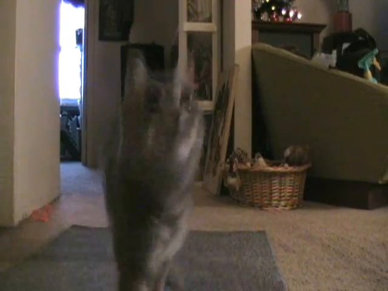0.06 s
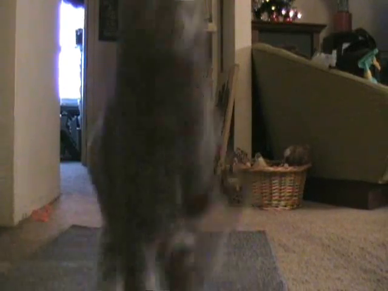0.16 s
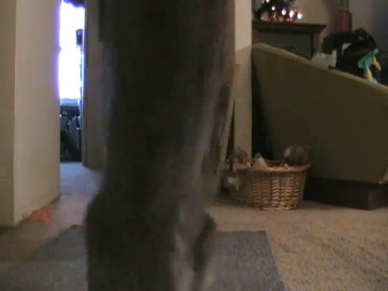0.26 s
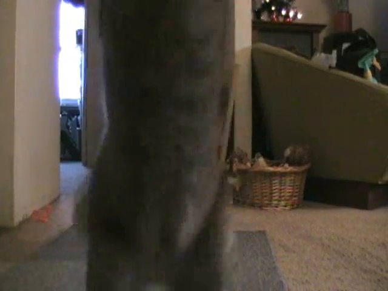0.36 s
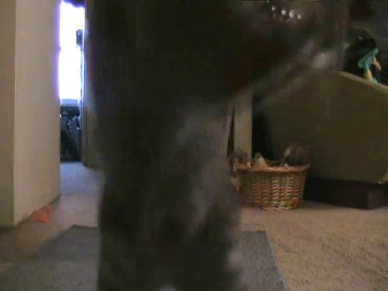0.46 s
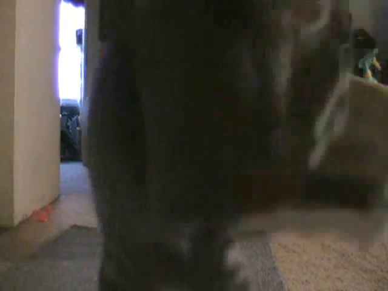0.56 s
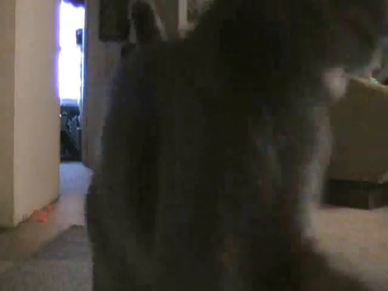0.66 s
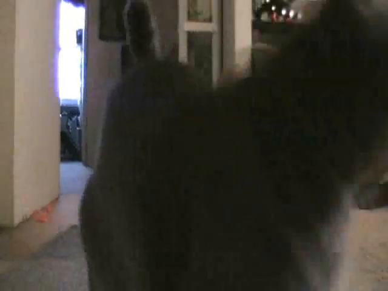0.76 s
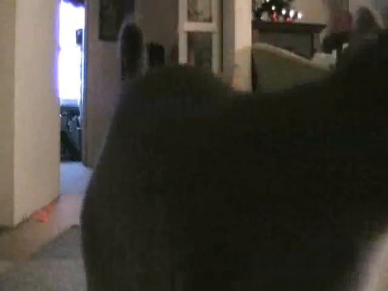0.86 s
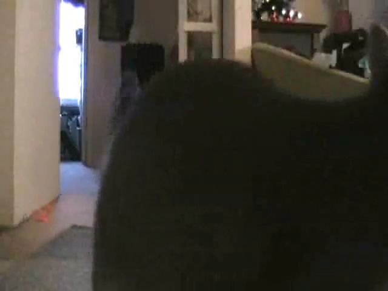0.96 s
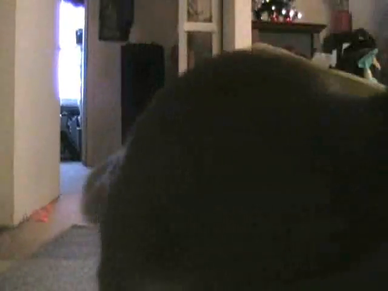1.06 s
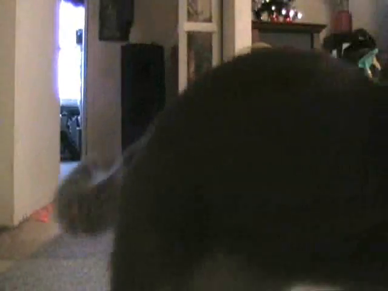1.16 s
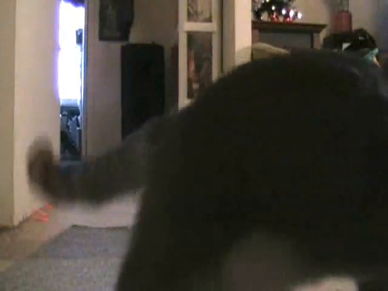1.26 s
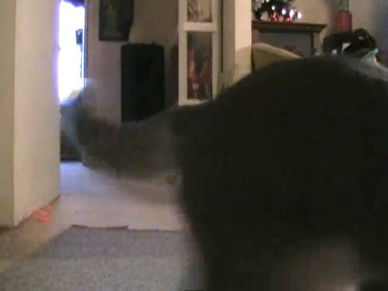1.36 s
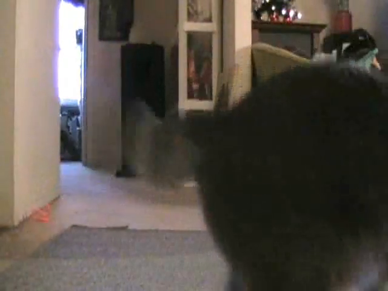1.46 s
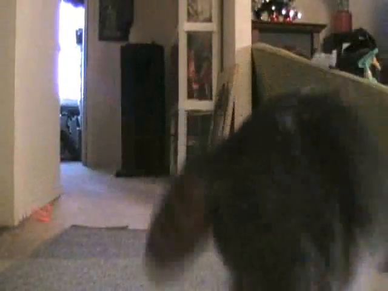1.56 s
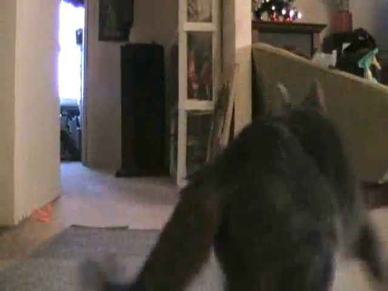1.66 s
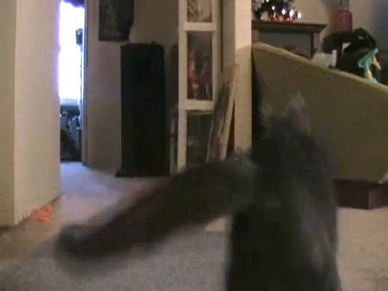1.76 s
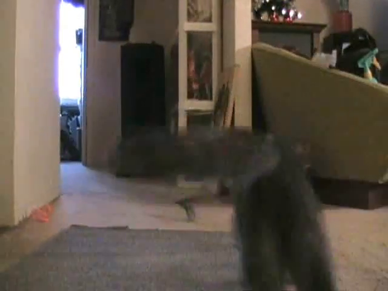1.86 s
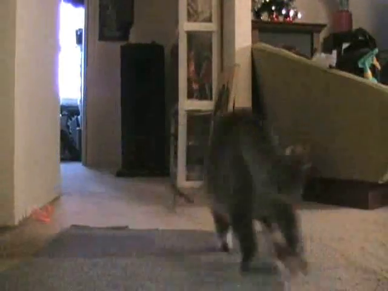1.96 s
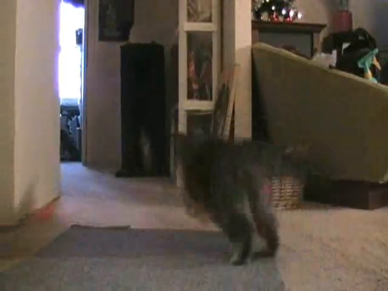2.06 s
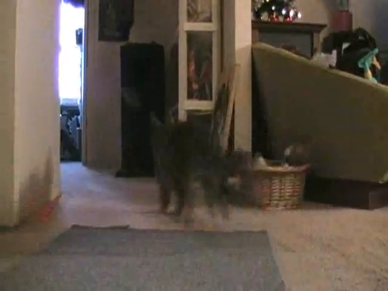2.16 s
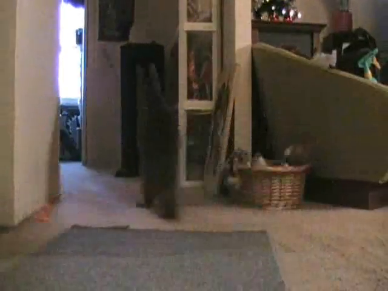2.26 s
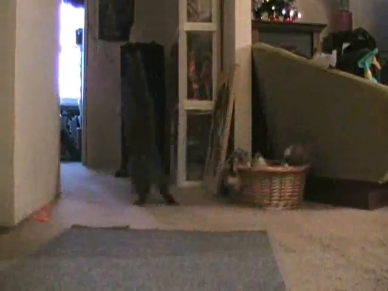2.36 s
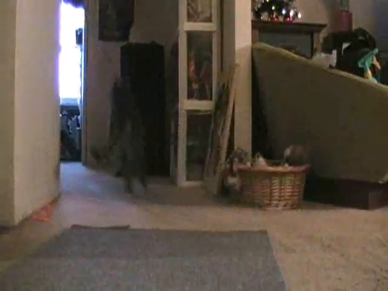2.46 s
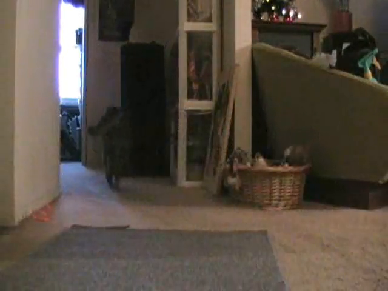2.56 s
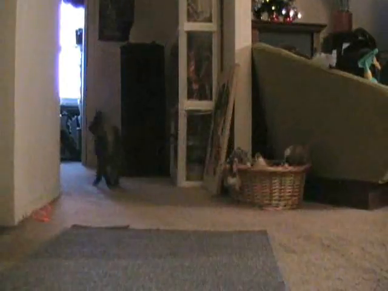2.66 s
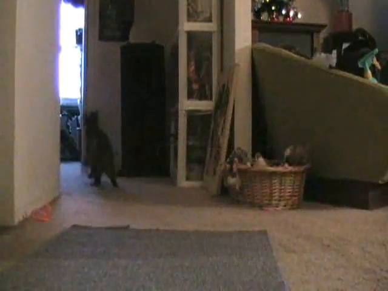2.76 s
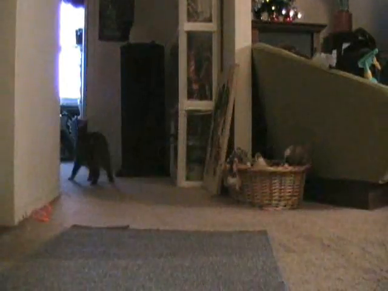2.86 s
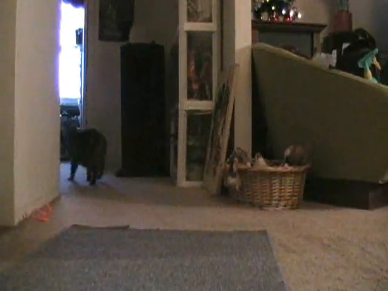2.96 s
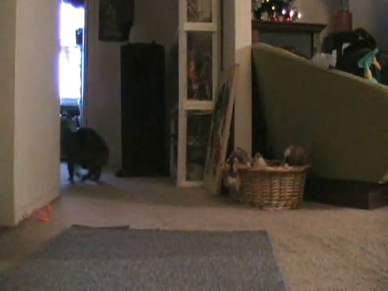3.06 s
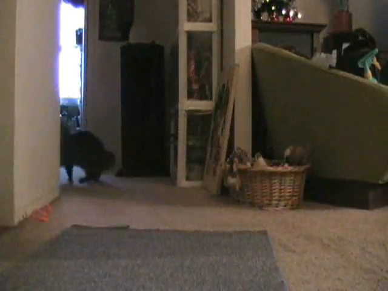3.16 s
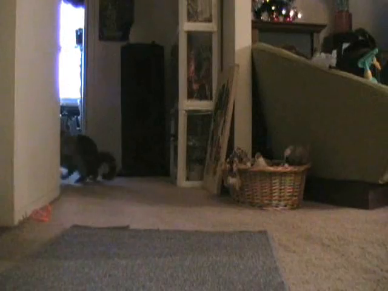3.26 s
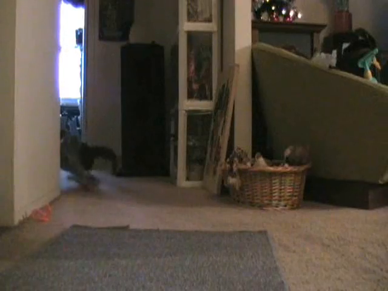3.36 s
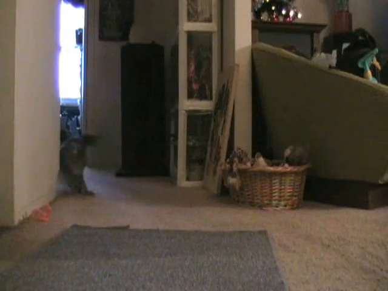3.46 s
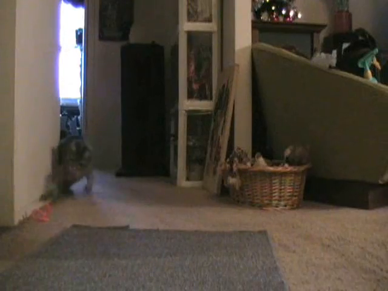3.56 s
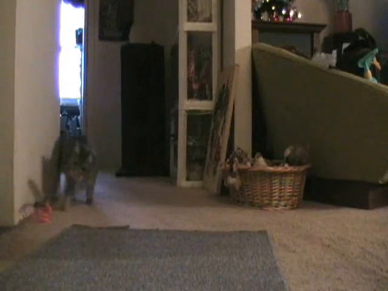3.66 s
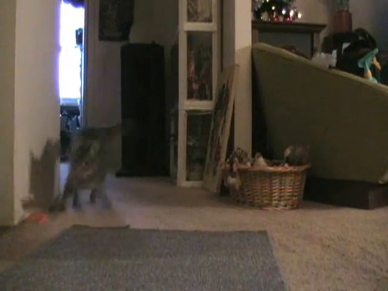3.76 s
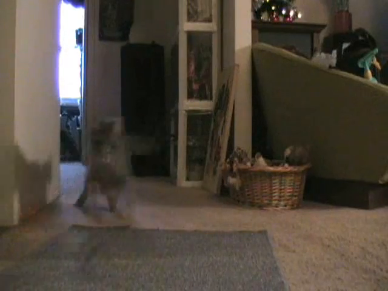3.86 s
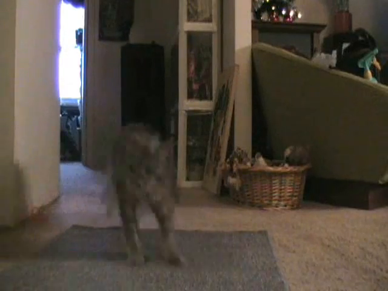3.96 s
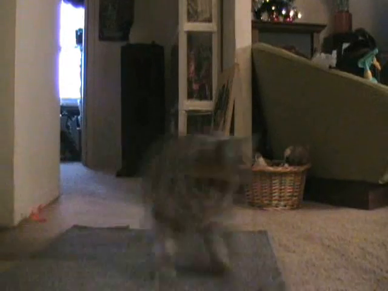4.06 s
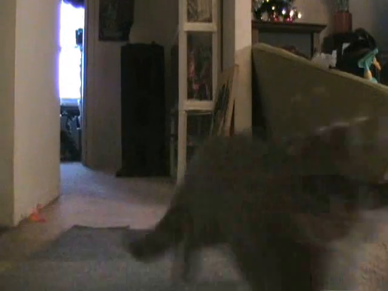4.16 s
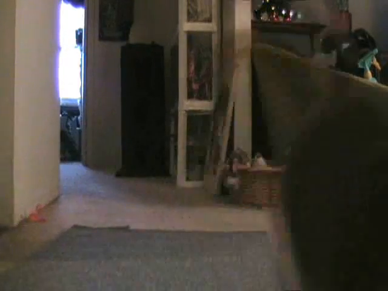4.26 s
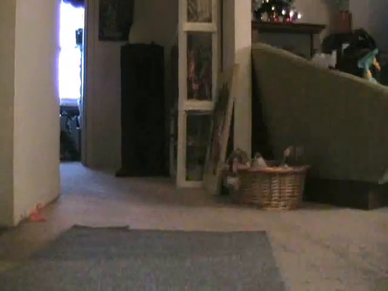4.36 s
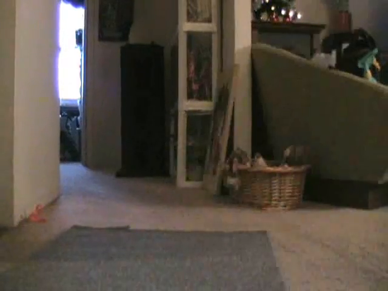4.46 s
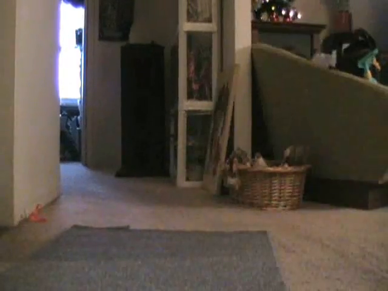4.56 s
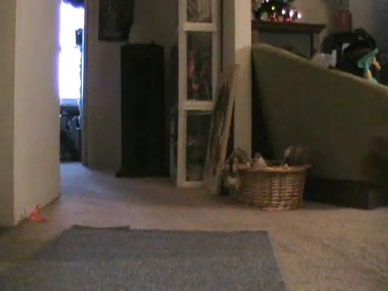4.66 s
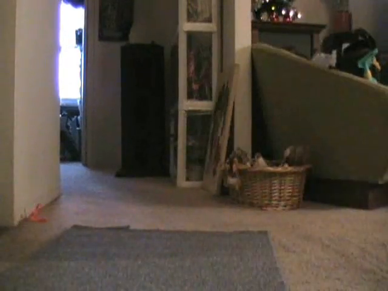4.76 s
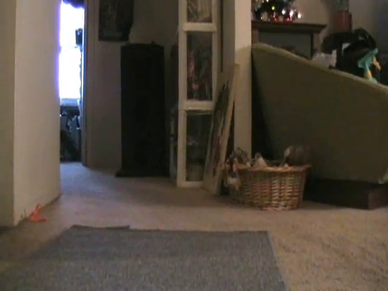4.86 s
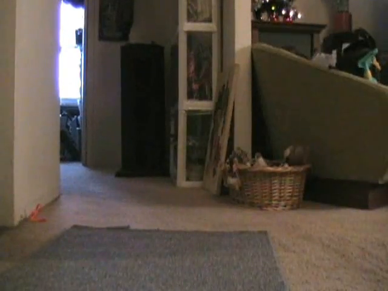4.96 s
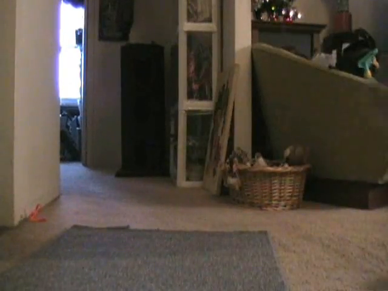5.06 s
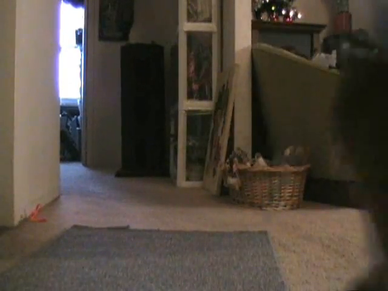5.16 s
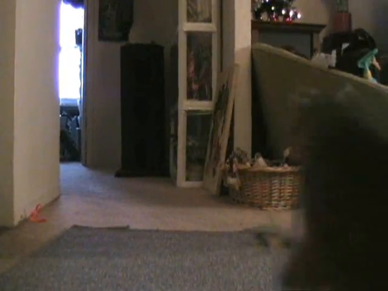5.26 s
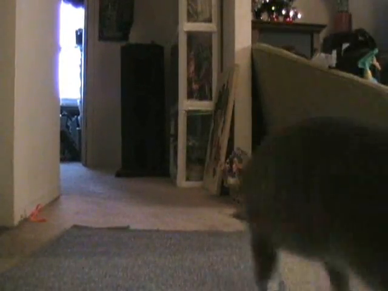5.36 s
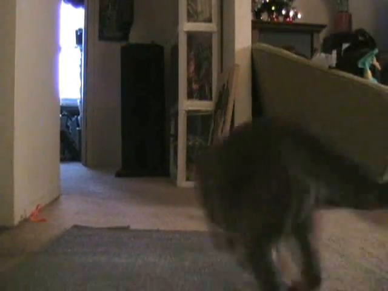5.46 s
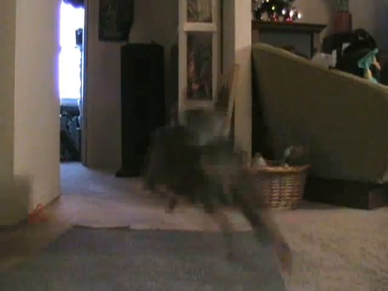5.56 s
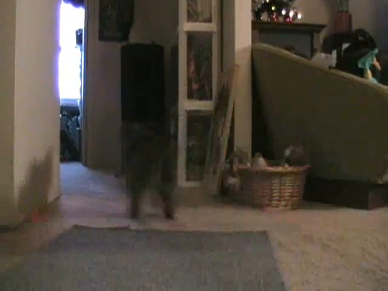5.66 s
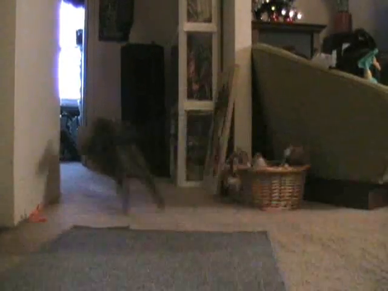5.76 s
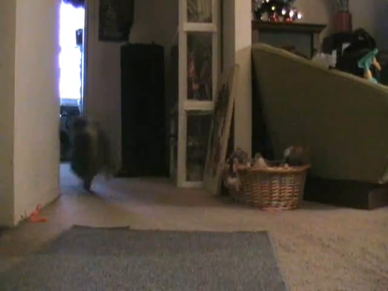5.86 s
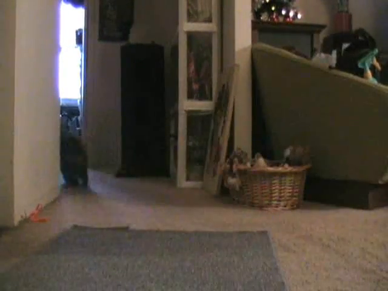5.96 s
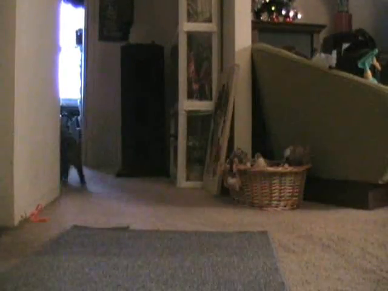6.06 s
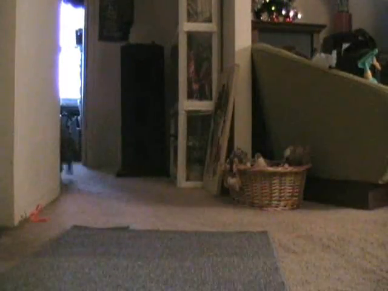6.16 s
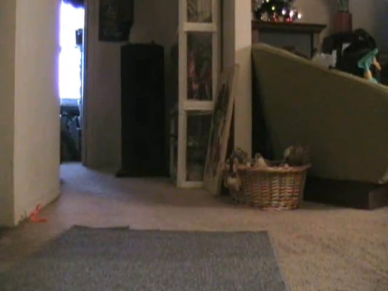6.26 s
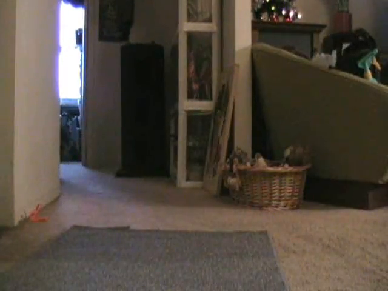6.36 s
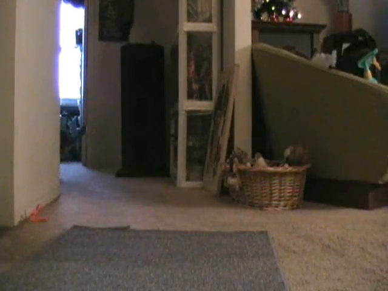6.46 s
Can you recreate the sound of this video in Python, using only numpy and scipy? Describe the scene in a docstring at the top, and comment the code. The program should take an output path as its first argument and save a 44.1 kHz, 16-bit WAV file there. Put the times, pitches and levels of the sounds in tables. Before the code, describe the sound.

A cat scrabbles and gallops over carpet close to a floor-level microphone, with sharp claw snaps, soft paw thumps, one hard bump, and steady hiss.

```python
"""Living room, carpet over a wooden floor: a cat pounces, skids and gallops close to a tape camcorder lying there.
Paws are sagging sine swings roughened with noise, heavy landings a slower sine of the joists.
Claws are filtered pulses with a spray of noise; pads and fur are coloured, swelling grains.
A jolt rings the camera body, with a far fainter knock behind it; sixteen feedback delays make the room.
Below lie microphone hiss, wavering hum and tones, and the whine of the tape drum's ticks."""
import sys
import numpy as np
from scipy import signal
from scipy.fft import rfft, irfft, next_fast_len
from scipy.io import wavfile

SR = 44100
rng = np.random.default_rng(int(sys.argv[2]) if len(sys.argv) > 2 else 0)


def natural_amplitude(level_db):
    """Convert a level in decibels to a linear amplitude factor, elementwise."""
    exponent = np.asarray(level_db, float) / 20
    return 10 ** exponent


def log_audio(samples):
    """Write samples as a 16-bit WAV file to the path given in sys.argv[1]."""
    # one column per channel
    frames = np.atleast_2d(samples).T
    # limit to full scale, then quantise
    limited = np.clip(frames, -1, 1)
    pcm = np.round(limited * 32767).astype(np.int16)
    wavfile.write(sys.argv[1], SR, pcm)


N = 287973   # samples, about 6.5 s

# Paw landings on the boards, close by; contact_s is how long the pad presses before the carpet damps:
# [start_s, level_db, pitch_hz, contact_s]
PAW_LANDINGS = [(.307, -31, 231, 0.0098), (0.322, -36.5, 127, 0.0079), (.381, -35.5, 526, 0.0034),
                (.408, -26, 510, 0.0048), (0.523, -27, 138, 0.016), (.617, -29.5, 320, 0.01),
                (0.633, -18.5, 530, 0.0022), (0.644, -33.5, 247, 0.011), (0.658, -24, 136, 0.0045),
                (0.818, -21.5, 252, 0.0089), (1.652, -31.5, 180, 0.0064), (1.839, -30, 197, 0.0094),
                (1.9, -29.5, 223, 0.0066), (1.976, -29, 167, 0.013), (2.112, -30, 296, 0.0032),
                (2.249, -31, 133, 0.051), (2.289, -30.5, 288, 0.02), (2.29, -36, 750, 0.027),
                (2.3708, -15, 248, 0.0045), (2.381, -28.5, 610, 0.0054), (2.383, -26, 220, 0.0092),
                (2.394, -26, 240, 0.014), (2.413, -18.5, 263, 0.0038), (2.43, -29, 194, 0.013),
                (2.655, -32.5, 196, 0.035), (3.409, -31.5, 240, 0.019), (3.539, -22, 316, 0.01),
                (3.553, -22, 195, 0.016), (3.531, -29, 704, .004), (3.624, -24.5, 607, 0.016),
                (3.644, -22, 212, 0.0065), (3.739, -41, 134, 0.029), (3.768, -34, 178, 0.025),
                (4.079, -29, 135, 0.01), (4.189, -22, 298, 0.009), (4.208, -23.5, 220, 0.006),
                (4.2372, -14.5, 225, 0.0096), (4.232, -28, 400, .004), (4.281, -21.5, 331, 0.02),
                (4.304, -7.5, 133, 0.0058), (4.355, -19, 417, 0.0031), (4.414, -17, 288, 0.0064),
                (4.418, -10, 355, 0.02), (4.535, -32, 506, 0.01), (4.549, -16.5, 352, 0.0024),
                (4.73, -25.5, 200, 0.0051), (5.284, -38, 384, 0.017), (5.349, -23.5, 298, 0.0039),
                (5.351, -34, 974, 0.016), (5.361, -40, 503, 0.0036), (5.436, -19.5, 298, 0.0025),
                (5.451, -26.5, 365, 0.0079), (5.534, -29, 520, 0.0037), (5.565, -22.5, 322, 0.0022),
                (5.578, -21, 188, 0.013), (5.655, -32, 260, 0.013), (5.713, -31, 220, 0.0075),
                (5.796, -28.5, 282, 0.011), (5.945, -32.5, 563, 0.019), (5.956, -27, 292, 0.017),
                (6.014, -25.5, 186, 0.029), (6.03, -36, 535, 0.02), (6.061, -29, 175, 0.024),
                (6.066, -27, 400, 0.003), (6.076, -29, 510, 0.0081), (6.109, -34, 190, 0.038),
                (6.147, -28, 175, 0.023), (6.152, -39.5, 502, 0.03), (6.238, -38, 195, 0.012)]


def paws(rise_cycles=0.72, damped_t60_s=0.029, held_t60_s=0.52):
    """The boards swing while the pad presses, then the carpet damps them; toes and pile roughen the swing."""
    rough = 0.3   # share of noise in a thump
    out, t = np.zeros((2, N)), np.arange(SR // 5) / SR
    places = pans(PAW_LANDINGS, scatter_db=2.5)
    noises = rng.standard_normal((len(PAW_LANDINGS), len(t)))
    for (start_s, level_db, pitch_hz, contact_s), pan_db, white in zip(PAW_LANDINGS, places, noises):
        rise = np.sin(np.pi / 2 * np.minimum(t * pitch_hz / rise_cycles, 1)) ** 2
        damped_db = -60 * np.maximum(t - contact_s, 0) / damped_t60_s
        press = rise * natural_amplitude(damped_db - 60 * t / held_t60_s)
        swing = np.sin(2 * np.pi * pitch_hz * t * (1 - 1.43 * t))   # the pitch sags as weight settles
        rub = band(white, 0.36 * pitch_hz, 1.64 * pitch_hz)
        rub = rms_one(band(rub, 0.36 * pitch_hz, 3.18 * pitch_hz))
        thump = press * ((1 - rough) * swing + rough * rub)
        add(out, start_s, natural_amplitude(level_db) * thump, pan_db)
    return out


# The whole weight comes down and the joists answer: [start_s, level_db]
WEIGHT_LANDINGS = [(0.305, -28), (.52, -36), (0.656, -40), (2.28, -40), (4.077, -34), (4.302, -26),
                   (4.43, -28.5), (5.181, -38), (5.559, -41), (6.001, -32.5)]


def landings(rise_s=0.0065, joist_hz=84.6, joist_t60_s=0.36):
    """A slow push sets the joists swinging."""
    out, t = np.zeros((2, N)), np.arange(SR // 2) / SR
    swing = (1 - np.exp(-t / rise_s)) * np.sin(2 * np.pi * joist_hz * t)
    for start_s, level_db in WEIGHT_LANDINGS:
        add(out, start_s, natural_amplitude(level_db - 60 * t / joist_t60_s) * swing)
    return out


# Claws snapping out of the pile; treble_db is the part above the centre, against the body:
# [start_s, level_db, centre_hz, treble_db]
CLAW_SNAPS = [(.308, -28.5, 583, -17), (.349, -28, 5200, -25), (0.381, -40, 1490, 4),
              (.4096, -3.5, 3930, -20), (.4116, -5.5, 3900, -14), (.4098, 0.5, 10800, -14),
              (0.412, -8, 9000, -12), (0.4138, -5.5, 9600, -15), (.4435, -23, 4500, -9),
              (0.5701, -25, 1270, -9), (0.571, -16, 5000, -13), (.6184, -12, 1690, -4),
              (0.6184, -5, 10200, -15), (0.6253, -8, 3900, -8), (0.628, -5, 5300, -2),
              (0.6347, -7.5, 1640, 0), (0.637, -14.5, 1320, -12), (0.6436, -9, 2200, 7.5),
              (0.6452, -8.5, 4030, -14), (0.6465, -9, 4030, -14), (0.647, -15, 1500, -20),
              (0.6522, -26, 2520, -9), (0.661, -19.5, 1290, -1), (1.9726, -28, 1000, 3),
              (1.98, -31, 2500, -4), (1.9842, -26.5, 1130, -2), (1.991, -32, 3500, -4),
              (2.194, -31.5, 910, -9), (2.218, -29, 880, 1), (2.2345, -29.5, 1550, -4),
              (2.245, -34, 900, -12), (2.2757, -31, 1100, -6), (2.301, -31, 800, -15),
              (2.314, -36, 800, -13), (2.373, -36, 890, -26.5), (2.382, -35, 646, -23),
              (2.417, -42, 1900, -14), (2.425, -29, 1100, -21), (3.518, -24, 10000, -8),
              (3.526, -36, 1490, -7), (3.542, -21, 885, -17), (3.55, -14, 780, -2), (3.564, -29, 1300, -9),
              (3.626, -13.5, 902, -13), (3.633, -15, 960, -29), (3.656, -22, 1300, -10),
              (3.68, -30, 1000, -10), (3.693, -32, 1300, -12), (4.044, -40, 969, 16.5),
              (4.154, -34, 1240, 4), (4.192, -25, 2000, -12), (4.1964, -18.5, 980, -8),
              (4.21, -24, 900, -8), (4.3051, -11.5, 2900, -13), (4.306, -7, 5030, -12),
              (4.307, -7, 1040, 0), (4.334, -33, 1500, -7), (4.357, -16, 1290, -29),
              (4.37, -27.5, 1200, -20), (4.42, -20, 1500, -5), (4.424, -22, 2200, -15),
              (4.43, -28, 2400, -12), (4.493, -30, 1500, -3), (4.5, -30, 1180, -6),
              (4.552, -19.5, 1180, -12), (5.351, -40, 940, -25), (5.363, -45, 1000, -25),
              (5.4118, -22, 1630, 8), (5.4376, -20, 1170, 7.5), (5.453, -31, 1820, -19),
              (5.483, -33, 5200, -10), (5.535, -26, 905, 2), (5.547, -28, 1010, -10),
              (5.567, -25, 670, -10), (5.575, -23.5, 2980, -18), (5.656, -27, 960, -2),
              (5.841, -34, 3630, 10), (5.944, -33, 934, -9), (6.015, -29, 700, -20),
              (6.022, -29.5, 1380, -21), (6.067, -34, 900, -16), (6.108, -36, 1100, -16)]


def claws(soften=0.26, spray_t60_s=0.023, top_snap=0.9):
    """A loop lets go: one sharp pulse, then a spray of fibres dying away."""
    spray_db, spray_follows = -21, 0.35   # spray against a unit pulse; extra dB per dB of level_db
    out, t = np.zeros((2, N)), np.arange(SR // 8) / SR
    places = pans(CLAW_SNAPS, scatter_db=2.4)
    noises = rng.standard_normal((len(CLAW_SNAPS), len(t)))
    for (start_s, level_db, centre_hz, treble_db), pan_db, white in zip(CLAW_SNAPS, places, noises):
        spray = white * natural_amplitude(spray_db + spray_follows * level_db - 60 * t / spray_t60_s)
        snap = np.sign(white[0]) * (t == 0)   # one sample, of random sign
        body = band(spray + snap, 0.65 * centre_hz, 1.33 * centre_hz)
        top = band(spray + top_snap * snap, 0.59 * centre_hz, 11900)   # a little more of it is spray
        top = signal.lfilter([1], [1, -soften], top)   # the pile takes the edge off
        claw = body / np.abs(body).max() - natural_amplitude(treble_db) * top / np.abs(top).max()
        add(out, start_s, natural_amplitude(level_db) * claw, pan_db)
    return out


# Pads and fur dragged over the pile; the centre is counted in octaves above 1 kHz:
# [peak_s, level_db, rise_s, t60_s, centre_octaves]
PAD_DRAGS = [(.31, -45.5, 0.032, 0.64, -1), (.418, -31, 0.0078, 0.13, 2.7), (.47, -49.5, 0.029, 1, 1.5),
             (.6, -36, 0.041, 0.43, 2.5), (0.652, -24, 0.029, 0.076, 2), (1.659, -42, 0.009, 0.13, -1.5),
             (1.781, -53, 0.035, .93, 5), (1.915, -42, 0.024, 1, -2), (1.981, -39.5, 0.029, 0.24, 2),
             (2.159, -46, 0.038, 0.56, 1.5), (2.23, -41.5, 0.043, 0.67, -0.5),
             (2.30, -41, 0.036, 0.15, -1.5), (2.415, -48, 0.029, 0.21, 0.5),
             (2.416, -33.5, 0.039, 0.25, -2), (2.67, -56, 0.011, 0.86, 2),
             (3.421, -44.5, 0.007, 0.27, -7.5), (3.549, -31.5, 0.019, 0.22, 0),
             (3.638, -23, 0.009, 0.25, 0.5), (3.665, -38, 0.022, 0.45, -1), (3.929, -48.5, 0.071, 0.91, 0),
             (4.082, -36.5, .011, 0.24, -2), (4.158, -38.5, 0.0054, 0.94, 0),
             (4.196, -28.5, 0.016, 0.31, -.5), (4.256, -47, 0.031, 0.24, 2), (4.268, -39, .015, .12, 1),
             (4.292, -26.5, 0.013, 0.19, -2.5), (4.359, -46.5, 0.004, 1, 1),
             (4.426, -32.5, 0.014, 0.28, 1.5), (4.5, -40, 0.042, 0.54, 1.9),
             (4.51, -38.5, 0.046, 0.35, -2.5), (4.554, -36, 0.017, 0.2, -0.5), (4.62, -49, 0.056, .32, 0.5),
             (5.14, -43.5, 0.023, 0.32, -1), (5.21, -53, 0.039, 1, 2), (5.295, -38.5, 0.029, 0.24, -0.5),
             (5.35, -41.5, 0.0035, 1, -1), (5.443, -41.5, 0.0072, 0.42, 1.5), (5.538, -38, .004, 0.19, 0.5),
             (5.578, -44.5, .005, 0.18, 1.5), (5.574, -38, 0.012, 0.65, -2), (5.657, -43, 0.008, 0.3, 1.24),
             (5.958, -40, 0.021, 0.35, 0), (6.024, -37.5, 0.0079, 1, -1.5), (6.074, -39, 0.02, 0.6, -2),
             (6.15, -45, 0.021, 0.25, -1), (6.26, -64, 0.024, 0.16, -6)]


def scuffs():
    """A heavy drag is dull; the higher its centre, the steeper the fall above."""
    # dB per octave for a 1 kHz centre is -9, and 1 dB steeper per octave of higher centre
    slopes_db = [-9 - row[-1] for row in PAD_DRAGS]
    return strokes(PAD_DRAGS, slopes_db, [0] * len(PAD_DRAGS), drag(), low_slope_db=4.5)


# Fur sweeping lightly over the pile, a broad even hiss: [peak_s, level_db, rise_s, t60_s, hold_s]
FUR_SWEEPS = [(0.38, -37.5, 0.0019, 0.97, .003), (0.411, -27.5, 0.0088, 0.13, 0.0033),
              (0.558, -37.5, 0.019, 0.34, 0.044), (0.624, -28.5, 0.0059, 0.11, 0.028),
              (3.53, -40, 0.014, 0.41, .003), (3.712, -39.5, 0.061, 0.38, .003),
              (4.152, -45.5, 0.0035, 0.61, 0.026), (4.411, -48, 0.0076, 0.19, 0.13),
              (4.55, -41.5, 0.01, 0.069, 0.0075), (5.841, -35.5, 0.0032, 0.27, 0.033)]


def brushes(centre_octaves=0.82, slope_db=-0.96):
    """All sweeps of fur share one bright colour, from grains finer and more even than a pad's."""
    hairs = drag(slips_per_s=6000, spread_db=2.5, clump_db=0.6)
    rows = [(*row[:-1], centre_octaves) for row in FUR_SWEEPS]
    holds_s = [row[-1] for row in FUR_SWEEPS]
    return strokes(rows, [slope_db] * len(rows), holds_s, hairs, low_slope_db=8)


def drag(slips_per_s=1900, spread_db=3.0, clump_s=0.0042, clump_db=1.84):
    """Fibres slip one by one under the pad: dense uneven grains, in clumps."""
    length = N + SR
    sizes = natural_amplitude(spread_db * np.minimum(rng.exponential(1, length), 4.0)) * rng.choice([-1, 1], length)
    slips = sizes * (rng.random(length) < slips_per_s / SR)
    grains = slips + 0.21 * rng.standard_normal(length)
    knots = np.arange(0, length, 44)   # about one each ms
    clumps = signal.lfilter([1], [1, -np.exp(-.001 / clump_s)], rng.standard_normal(len(knots)))
    return grains * natural_amplitude(clump_db * np.interp(np.arange(length), knots, rms_one(clumps)))


def strokes(rows, slopes_db, holds_s, slips, low_slope_db=8, scatter_db=3.5):
    """Each stroke swells, holds, lets go and dies; its colour rises to a centre and falls above it."""
    out, size = np.zeros((2, N)), 2 ** 15
    t = np.arange(size) / SR
    octave = np.log2(np.arange(1, size // 2 + 2) * SR / size / 1000)   # above 1 kHz
    for row, slope_db, hold_s, pan_db in zip(rows, slopes_db, holds_s, pans(rows, scatter_db)):
        peak_s, level_db, rise_s, t60_s, centre_octaves = row
        above = octave - centre_octaves
        colour = natural_amplitude(np.where(above > 0, slope_db, low_slope_db) * above)
        stretch = slips[int(peak_s * SR):][:size]
        grains = rms_one(irfft(colour * rfft(stretch, size), size))
        dying_db = -60 * np.maximum(t - rise_s - hold_s, 0) / t60_s
        swell = np.minimum(t / rise_s, 1) ** 2
        add(out, peak_s - rise_s, swell * natural_amplitude(level_db + dying_db) * grains, pan_db)
    return out


# Bearing of the cat from the microphone; left_late_samples is the lag of the left capsule,
# pan_db is left over right: [start_s, left_late_samples, pan_db]
CAT_BEARING = [(0, 0.13, 5), (.5, -0.55, -1.5), (.7, -0.72, -3), (1.997, 0.43, 0), (3.6, -0.34, 0),
               (4.1, 0.065, 0), (4.5, 1, -3), (5.398, 1, -1), (5.9, 0.36, 1.1), (6.5, -.35, -4)]


def pans(rows, scatter_db):
    """Left-right dB of each contact: the cat's bearing, and where the paw happens to be."""
    bearing_s, _, pan_db = np.transpose(CAT_BEARING)
    return np.interp([row[0] for row in rows], bearing_s, pan_db) + scatter_db * rng.standard_normal(len(rows))


def widen(x, widen_hz=248, widen_db=9, mic_cut_hz=70):
    """Close capsules hear little difference in the bass; the camera lifts it."""
    mid, side = (x[0] + x[1]) / 2, (x[0] - x[1]) / 2
    low = signal.sosfilt(signal.butter(1, widen_hz, fs=SR, output="sos"), side)
    bearing_s, left_late_samples, _ = np.transpose(CAT_BEARING)
    late = np.interp(np.arange(N) / SR, bearing_s, left_late_samples)
    side = side - late / 2 * np.diff(mid, prepend=0)   # a small delay is a slope
    mid = signal.sosfilt(signal.butter(2, mic_cut_hz, "high", fs=SR, output="sos"), mid)
    return mid + (side + natural_amplitude(widen_db) * low) * [[1], [-1]]


# Colour of the capsules behind their grille: [centre_hz, width_hz, share added (a factor)]
GRILLE_COLOUR = [(6500, 6000, -0.36), (13300, 1300, 0.87)]


def grille(x):
    """Resonances subtracted and added make a dip and a lift in the treble."""
    return x + sum(share * resonate(x, hz, width_hz) for hz, width_hz, share in GRILLE_COLOUR)


# Knocks on the camera body: [start_s, level_db]
CAMERA_KNOCKS = [(4.308, 0), (4.357, -37)]
# Modes in which the camera body rings: [pitch_hz, level_db, t60_s]
BODY_MODES = [(144, 5, 0.038), (82, -13, 0.2), (47.4, -18, 0.42)]


def jolts(rise_s=0.0022):
    """The shaken capsules move against each other, so the knock is opposite in the two channels."""
    out, t = np.zeros((2, N)), np.arange(SR // 2) / SR
    ring = sum(natural_amplitude(level_db - 60 * t / t60_s) * np.sin(2 * np.pi * pitch_hz * t)
               for pitch_hz, level_db, t60_s in BODY_MODES)
    for start_s, level_db in CAMERA_KNOCKS:
        add(out, start_s, natural_amplitude(level_db) * ring * (1 - np.exp(-t / rise_s)))
    return out * [[1], [-1]]


def room(x, room_t60_s=0.38, wall_cut_hz=820):
    """Eight feedback delays a side, duller on every round."""
    size = next_fast_len(N + SR)
    w = 2 * np.pi * np.arange(size // 2 + 1) / size   # radians per sample
    t60_s = room_t60_s / np.sqrt(1 + (w * SR / (2 * np.pi * wall_cut_hz)) ** 2)
    tails = np.zeros((2, len(w)), complex)
    for k, lag_s in enumerate(np.geomspace(.009, .037, num=16)):
        echo = natural_amplitude(-60 * lag_s / t60_s) * np.exp(-1j * w * round(lag_s * SR))
        tails[k % 2] += (-1) ** (k // 2) * echo / (1 - echo)   # the sum of all rounds
    return irfft(tails * rfft(x, size), size)[:, :N] / np.sqrt(8)


# Spectrum of the hiss common to both capsules, relative levels: [pitch_hz, level_db (per Hz)]
COMMON_HISS = [(25, -28), (70, -14.5), (130, -5), (260, -13.5), (550, -15), (1200, -18.5), (1600, -22.5),
               (2000, -23), (4800, -28), (5600, -27.5), (6700, -32.5), (8000, -35), (9300, -32),
               (10500, -36), (11500, -34.5), (12400, -27)]
# Spectrum of the hiss of their difference, mostly bass, relative levels: [pitch_hz, level_db (per Hz)]
DIFFERENCE_HISS = [(15, -47), (25, 0), (125, -0.5), (159, -2), (207, -6), (863, -23.5), (1180, -23.5),
                   (1540, -30.5), (2290, -28.5), (6260, -35.5), (8160, -39.5), (10900, -39.5),
                   (13800, -17.5)]
# Wavering hum and drum tones: [pitch_hz, width_hz, level_db (rms)]
HUM_TONES = [(113.7, 9.8, -53.5), (191.5, 23, -58), (953, 14, -66.5), (2870, 12, -72.5)]
# Head switching ticks, each a puff of noise in a narrow band: [ticks per s, low_hz, high_hz, level_db (rms)]
DRUM_TICKS = (299.5, 5782, 6442, -62.5)


def camera_noise(common_db=-47.5, difference_db=-38):
    """Hiss and hum common to both capsules, the drum's ticks, and hiss of their difference."""
    mid = natural_amplitude(common_db) * coloured(COMMON_HISS)
    for pitch_hz, width_hz, level_db in HUM_TONES:
        tone = resonate(rng.standard_normal(N), pitch_hz, width_hz)
        mid += natural_amplitude(level_db) * rms_one(resonate(tone, pitch_hz, width_hz))
    per_s, low_hz, high_hz, level_db = DRUM_TICKS
    beats = np.diff(np.floor(np.arange(N + 1) * per_s / SR))   # 1 at each tick, else 0
    ticks = beats * (0.79 + rng.standard_normal(N))
    mid += natural_amplitude(level_db) * rms_one(band(band(ticks, low_hz, high_hz), low_hz, high_hz))
    side = natural_amplitude(difference_db) * coloured(DIFFERENCE_HISS)
    tilt = natural_amplitude(np.array([[-0.5], [0.5]]))   # a little stronger on the right
    return mid + side * tilt * [[1], [-1]]


def coloured(spectrum):
    """Steady noise with the given dB per Hz; rms 1."""
    size = next_fast_len(N)
    hz, db = np.transpose(spectrum)
    gain = natural_amplitude(np.interp(np.log(np.arange(size // 2 + 1) * SR / size + 1), np.log(hz), db))
    return rms_one(irfft(gain * rfft(rng.standard_normal(size)), size)[:N])


def rms_one(x):
    """Scale to rms 1."""
    return x / np.sqrt(np.mean(x ** 2) + 1e-20)


def band(x, low_hz, high_hz):
    """Butterworth band-pass."""
    edges_hz = [low_hz, min(high_hz, .45 * SR)]
    return signal.sosfilt(signal.butter(2, edges_hz, "band", fs=SR, output="sos"), x)


def resonate(x, hz, width_hz):
    """Two-pole resonance, gain 1 on top."""
    r = np.exp(-np.pi * width_hz / SR)
    poles = [1, -2 * r * np.cos(2 * np.pi * hz / SR), r * r]
    return signal.lfilter([(1 - r * r) / 2, 0, (r * r - 1) / 2], poles, x)


def add(track, start_s, sound, pan_db=0):
    """Mix a short sound into a stereo track; positive pan_db leans left."""
    i = int(start_s * SR)
    track[:, i:i + len(sound)] += sound[:N - i] * natural_amplitude(np.array([[pan_db / 2], [-pan_db / 2]]))


def scene():
    """The cat in the room, widened by the camera, over the camera's own noise."""
    cat = paws() + landings() + claws() + scuffs() + brushes()
    tail = room(cat.mean(0))
    middle = tail.mean(0)
    tail = middle + 0.26 * (tail - middle)   # the capsules are close: the echoes are much alike
    room_db = -12
    return widen(grille(cat + natural_amplitude(room_db) * tail)) + jolts() + camera_noise()


def band_limit(x):
    """A steep low-pass at the top of the band."""
    return signal.sosfilt(signal.butter(12, 13990, fs=SR, output="sos"), x)


def record(dry):
    """Peaks are rounded, then the top is cut."""
    rounded = np.tanh(dry / 1.1) * 1.1
    top_cut = signal.cheby2(7, 55, 14500, fs=SR, output="sos")   # 55 dB down from 14.5 kHz up
    mix = signal.sosfilt(top_cut, rounded)
    return band_limit(mix)


dry = scene()
out = record(dry)
log_audio(out)
```